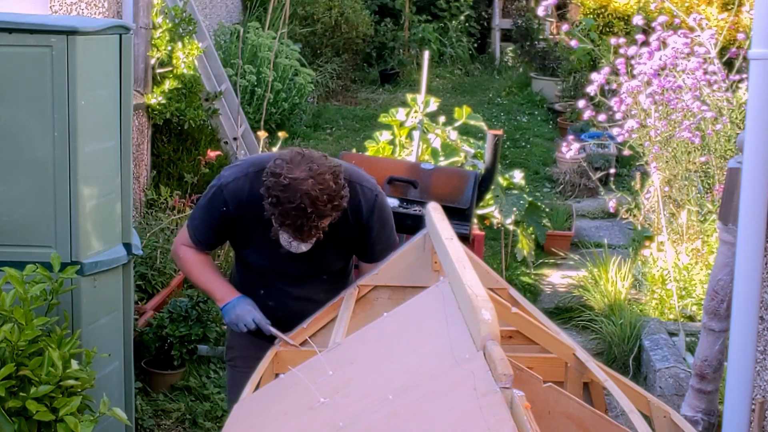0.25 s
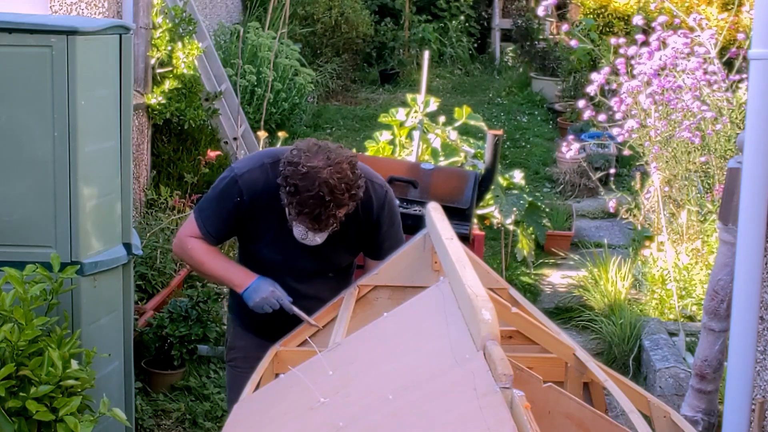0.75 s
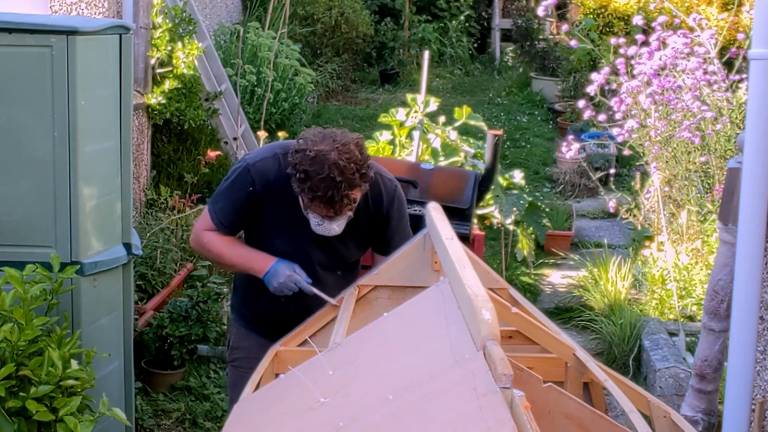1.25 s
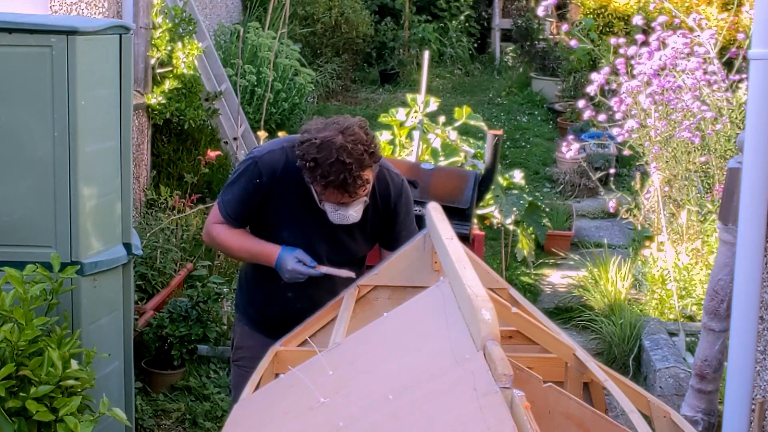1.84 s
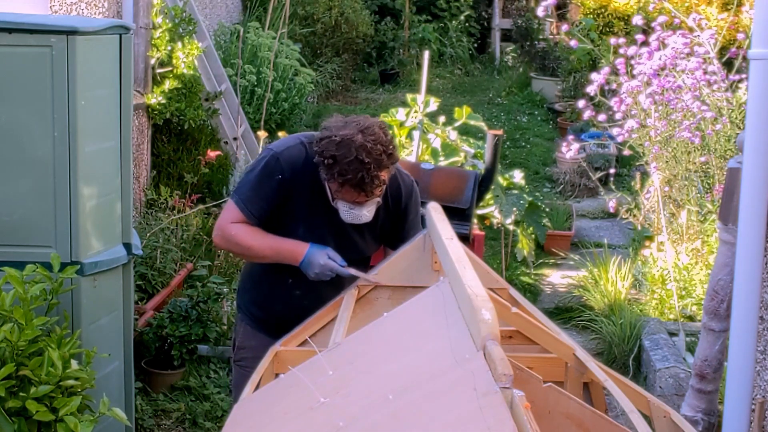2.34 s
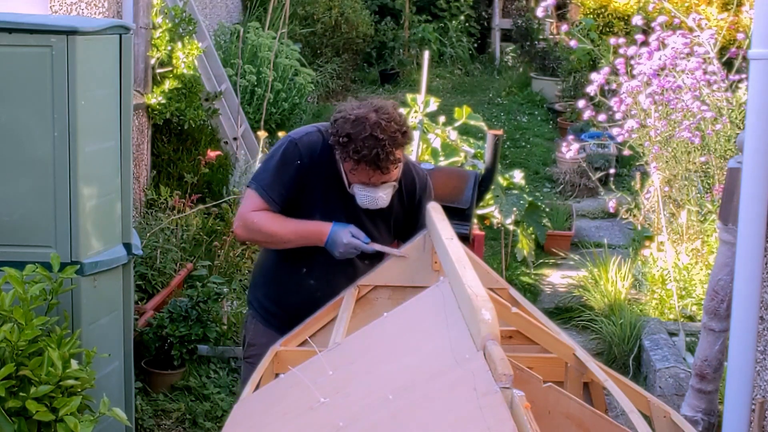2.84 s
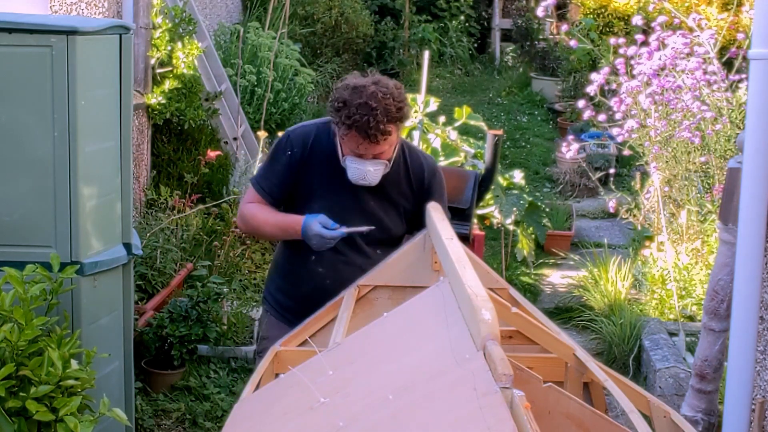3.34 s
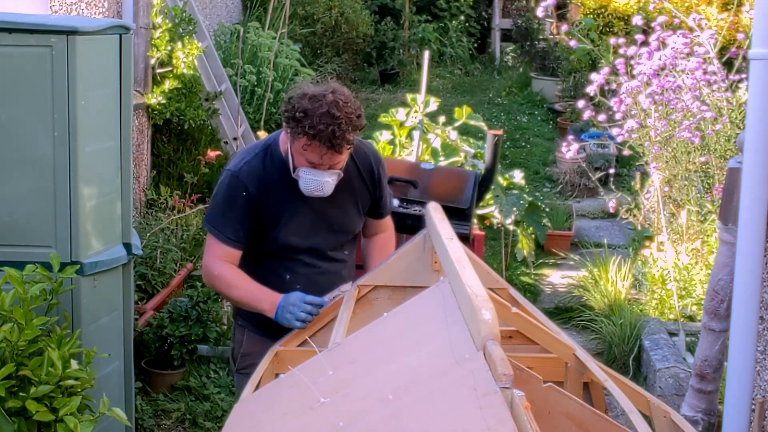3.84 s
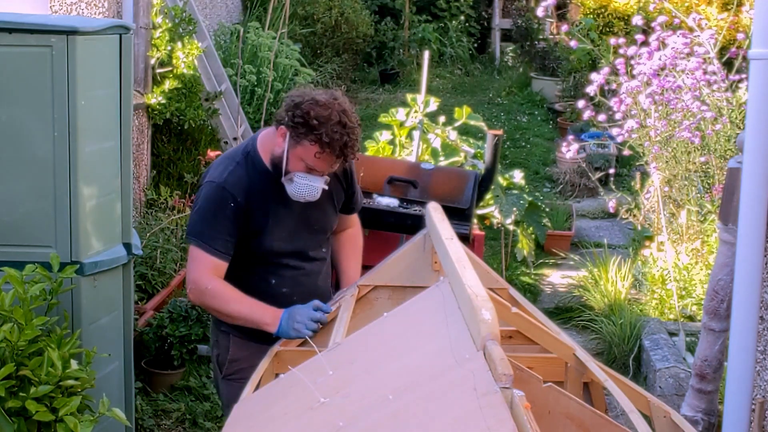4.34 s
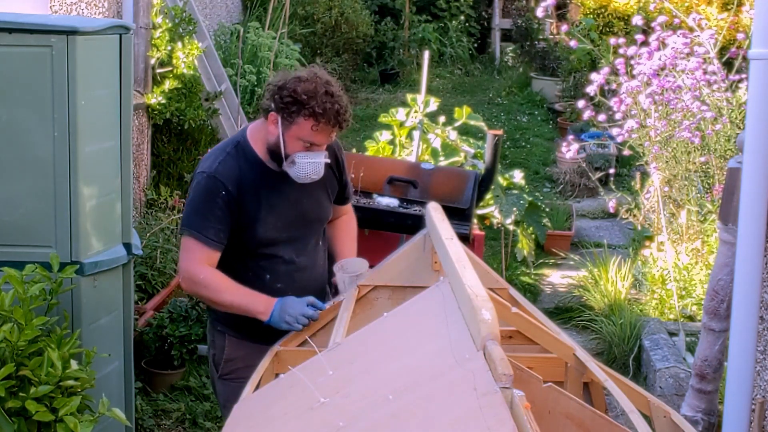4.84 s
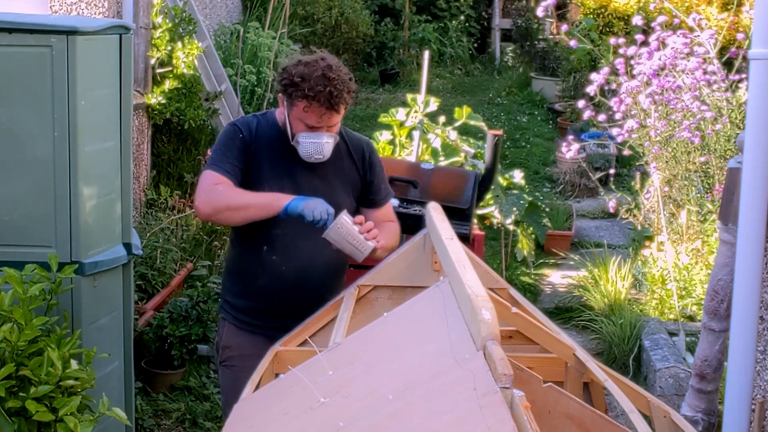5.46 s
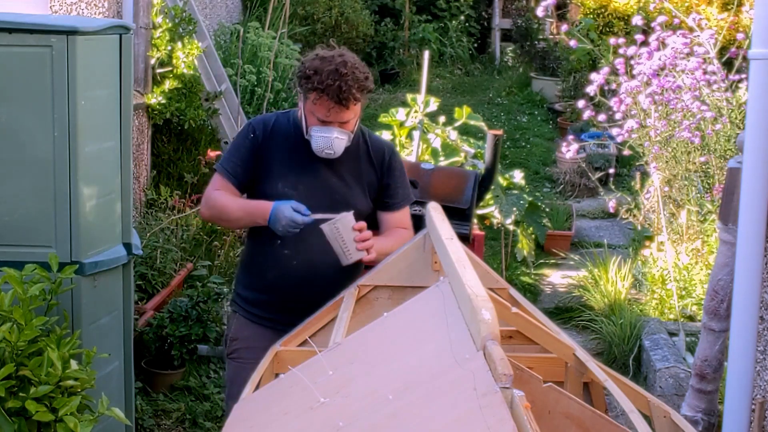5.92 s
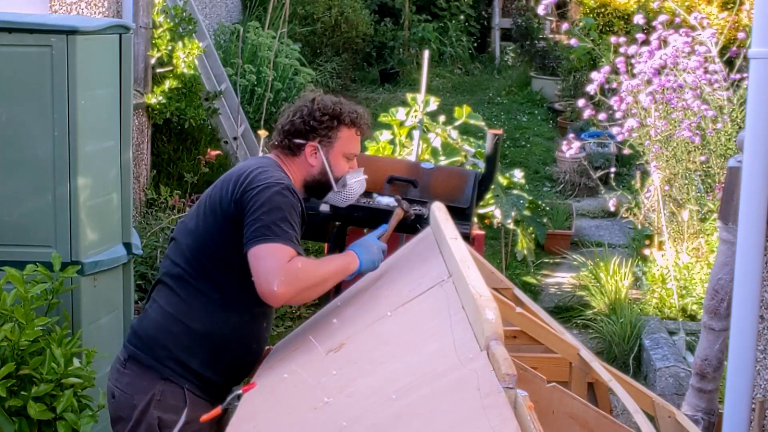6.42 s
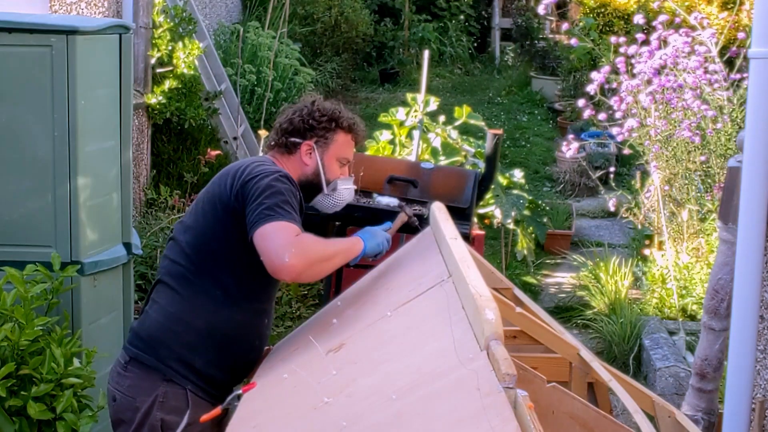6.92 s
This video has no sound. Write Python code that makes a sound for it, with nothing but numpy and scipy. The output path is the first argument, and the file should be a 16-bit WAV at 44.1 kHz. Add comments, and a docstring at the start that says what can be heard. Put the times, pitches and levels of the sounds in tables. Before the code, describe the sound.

Outdoors in a garden, a stick knocks on hollow wooden frames, chatters quickly, then rubs and scratches plywood. A far engine slows and picks up again over traffic and leaf hiss. The stick clacks in a plastic cup and squeaks. A cut ends engine and rubbing with a low thump; a distant dove coos and a single loud hammer blow rings the panel. Wind sways the microphone with deep rumble.

```python
"""Boatbuilding in a garden

A stick rubs, knocks and chatters on plywood and in a plastic cup (friction noise, struck modes), then a
hammer lands one blow on the hull. A far engine slows and speeds up (harmonics of its cycle), a dove coos
(sines), traffic and leaves hiss (coloured noise) and wind sways the microphone (slow resonant noise).
At a splice the engine and the rubbing cut off and a pressure jump thumps."""
import sys
import numpy as np
from scipy.fft import rfft, irfft, next_fast_len
from scipy.io import wavfile
from scipy.ndimage import uniform_filter1d, map_coordinates

SR = 44100
rng = np.random.default_rng(int(sys.argv[2]) if len(sys.argv) > 2 else 0)


def int16_out(signal):
    """Quantize to a 16-bit WAV file."""
    q = np.round(np.clip(np.atleast_2d(signal).T, -1, 1) * 32767)
    wavfile.write(sys.argv[1], SR, q.astype(np.int16))


N = 317079
# The splice: t/s, pressure jump/full scale before its smoothing
SPLICE_POINT = (6.041, 0.3)


def amp(db):
    """Level law: decibels to an amplitude ratio."""
    return 10 ** (np.asarray(db) / 20)


def unit(x):
    """Normalisation to a root-mean-square value of 1."""
    return x / np.sqrt(np.mean(x ** 2) + 1e-20)


def along(points, hz):
    """Spectral envelope: (f/Hz, value) points joined on a logarithmic frequency axis."""
    f, v = np.transpose(points)
    return np.interp(np.log(hz + 1), np.log(f + 1), v)


def curves(rows):
    """Linear interpolation in time: one value per sample for each column after t/s."""
    s, *cols = np.transpose(rows)
    return [np.interp(np.arange(N) / SR, s, c) for c in cols]


def wobble(rate):
    """Slow random modulation: a smooth curve through random knots, rate of them a second."""
    knots = rng.standard_normal(int(N * rate / SR) + 4)
    return map_coordinates(knots, [np.arange(N) * rate / SR])


def filtered(x, response):
    """Linear filtering: the spectrum of x times a complex response of frequency."""
    m = next_fast_len(len(x) + 8192)
    return irfft(rfft(x, m) * response(np.fft.rfftfreq(m, 1 / SR)), m)[:len(x)]


def peak(f, hz, width):
    """Damped oscillator: a causal resonance of gain 1 at its centre."""
    return 1j * f * width / (hz * hz - f * f + 1j * f * width)


def before_splice():
    """Gating: 1 until the splice, 0 after it."""
    return np.arange(N) < SPLICE_POINT[0] * SR


def swell(start, end):
    """Amplitude envelope: a rounded rise and fall between two times in seconds."""
    phase = np.clip((np.arange(N) / SR - start) / (end - start), 0, 1)
    return np.abs(np.sin(np.pi * phase)) ** 0.42


def traffic_and_leaves():
    """Broadband noise from many incoherent sources, coloured by frequency and slightly unsteady."""
    # Mean levels: t/s, traffic level/dB (in 250-1500 Hz), leaves level/dB
    garden_levels = [(0, -45.5, -52.5), (1.5, -44, -54.5), (2.1, -47.5, -54.5), (4, -45.5, -52),
                     (6.03, -46, -54.5), (6.05, -47, -57.5), (7.19, -46.5, -55.5)]
    # Traffic spectrum: f/Hz, relative level per Hz/dB
    traffic_colour = [(12, -23), (25, -27), (40, -26.5), (70, -30), (110, -40.5), (170, -29.5), (260, -38),
                      (450, -39), (1000, -41.5), (1400, -46), (1700, -53.5), (3000, -78.5), (6000, -80.5)]
    # Leaf spectrum: f/Hz, relative level per Hz/dB
    leaf_colour = [(800, 0), (1800, 3.5), (3000, 0), (4400, 0), (5300, -4), (6000, -19), (9000, -21),
                   (16000, -29)]
    traffic_db, leaves_db = curves(garden_levels)
    far = filtered(rng.standard_normal(N), lambda hz: amp(along(traffic_colour, hz)))
    far = far / np.std(filtered(far, lambda hz: (hz > 250) * (hz < 1500)))
    leaves = unit(filtered(rng.standard_normal(N), lambda hz: amp(along(leaf_colour, hz))))
    traffic = amp(traffic_db + 1.1 * wobble(4.115)) * far
    return traffic + amp(leaves_db + 1.1 * wobble(5.6)) * leaves


def microphone_sway():
    """Random excitation of a slow resonance: wind sways the microphone; the splice jumps its swing."""
    sway = filtered(rng.standard_normal(N), lambda hz: peak(hz, 2.41, 1.37) / (1 + (hz / 7) ** 3))
    t = np.maximum(np.arange(N) / SR - SPLICE_POINT[0], 0)
    # the sway is elsewhere in its swing after the splice
    jump = SPLICE_POINT[1] * (1 - np.exp(-t / 0.0018)) * np.exp(-t / 0.083)
    return amp(-19.5) * unit(sway) + jump


def dove():
    """Nearly pure tones: two soft sines from far off, gently wavering in level and phase."""
    # Coos: start t/s, end t/s, f/Hz, mean level/dB
    coos = [(6.678, 6.934, 407, -47.5), (6.938, 7.19, 505, -41)]
    out = np.zeros(N)
    for start, end, hz, db in coos:
        tone = np.sin(2 * np.pi * hz * np.arange(N) / SR + 0.45 * wobble(7.3))
        out += amp(db + 1.5 * wobble(12)) * swell(start, end) * tone
    return out


def engine():
    """Harmonic series: multiples of the engine cycle, each wavering, shaped by the exhaust."""
    # Engine cycle: t/s, f/Hz
    cycle = [(0, 18.4), (.4, 18.2), (.85, 16.7), (2.7, 15.4), (3, 15.5), (4.15, 17.3), (5, 18.2),
             (5.8, 19.4), (6.03, 19.5)]
    # Engine loudness: t/s, relative level/dB
    loudness = [(0, -39), (.45, -43.5), (.9, -48), (2.2, -49), (2.6, -41.5), (3, -34), (3.42, -39),
                (3.95, -33.5), (4.6, -43), (5.4, -44.5), (5.8, -37.5), (6.03, -44)]
    # Exhaust colour: f/Hz, gain/dB
    exhaust = [(30, -44), (80, -14), (105, -17), (125, -3.5), (190, -12.5), (220, -24.5), (400, -21)]
    cycle_hz, = curves(cycle)
    level_db, = curves(loudness)
    turn = 2 * np.pi * np.cumsum(cycle_hz) / SR
    # the ninth multiple carries best at first, later the tenth
    best_multiple = 8.93 + 0.13 * np.arange(N) / SR
    orders = np.zeros(N)
    for k in range(2, 14):
        gain = amp(along(exhaust, k * cycle_hz)) + np.exp(-((k - best_multiple) / 0.67) ** 2)
        waver = amp(2.5 * wobble(2.59))
        orders += gain * waver * np.sin(k * turn + 0.79 * wobble(4) + rng.uniform(0, 2 * np.pi))
    return amp(level_db - 2.5) * orders * before_splice()


def squeaks():
    """Friction-excited resonance: the stick sings along an edge in narrow bands of noise."""
    # Squeaks: start t/s, end t/s, f/Hz, mean level/dB
    songs = [(2.7, 2.92, 1700, -54), (4.43, 4.62, 750, -46), (4.43, 4.62, 1800, -48),
             (4.47, 4.7, 2750, -52), (4.5, 4.7, 3720, -53), (4.6, 4.7, 4340, -52), (4.89, 4.99, 1770, -50),
             (4.82, 5.1, 4550, -58), (5.77, 5.86, 780, -42), (5.885, 5.99, 1340, -43),
             (5.86, 6.0, 3100, -54), (5.85, 6.04, 4550, -54), (5.885, 5.905, 4550, -44),
             (5.922, 5.937, 4600, -45), (5.948, 5.972, 4600, -44)]
    out = np.zeros(N)
    for start, end, hz, db in songs:
        band = filtered(rng.standard_normal(N), lambda f: peak(f, hz, 0.065 * hz) ** 2)
        out += amp(db + 2.1 * wobble(50)) * swell(start, end) * unit(band)
    return out


def scratches():
    """Transient friction: decaying grit of the stick's edge, one broad resonance and a wider hiss."""
    # Scratches: t/s, level/dB before rise and decay, centre f/Hz, relative hiss level/dB
    bursts = [(0.2177, -40.5, 1720, -11), (0.353, -29, 2040, -14), (0.363, -26, 2020, -12),
              (0.487, -28, 1580, -14), (0.622, -20.5, 1500, -18), (0.7165, -39, 1450, -8),
              (1.222, -34, 2200, -2), (2.646, -42, 1710, -1), (3.5967, -32, 2400, 22),
              (3.607, -36, 2400, 15), (3.6172, -33, 1620, -3), (3.6973, -34.5, 1620, -9.5),
              (3.8267, -38, 3670, -15), (3.923, -31.5, 1600, -10), (4.2297, -41, 1590, -24),
              (4.3796, -24.5, 3860, -2.5), (4.544, -33, 1740, 8), (4.6718, -30, 1910, -2),
              (4.788, -37, 1610, -10), (4.915, -38.5, 4540, -3), (5.328, -30.5, 1710, -2),
              (5.3512, -37, 1710, -2), (5.374, -43, 2360, -10), (5.757, -44, 3020, -10),
              (5.774, -39, 1490, 0), (5.8, -33, 2160, -6), (5.822, -27.5, 2180, -1), (5.835, -22, 2300, -7),
              (5.9, -33.5, 3020, 4)]
    rise_s, t60_s = 0.0018, 0.058
    out, t = np.zeros(N + SR), np.arange(SR // 4) / SR
    for s, db, hz, hiss_db in bursts:
        def colour(f):
            bands = peak(f, hz, 0.37 * hz) ** 2 + amp(hiss_db) * peak(f, 2750, 2200) ** 2
            return bands / (1 + 1j * f / 7000)
        grit = unit(filtered(rng.standard_normal(len(t)), colour))
        out[round(s * SR):][:len(t)] += amp(db - 60 * t / t60_s) * (1 - np.exp(-t / rise_s)) * grit
    return out[:N]


def stroke(start, end, first_db, last_db):
    """Pressure envelope: a quick rise, a steady change of level, a quick fall."""
    rise_s, fall_s = 0.032, 0.05
    t = np.arange(N) / SR
    shape = np.clip(np.minimum((t - start) / rise_s, (end - t) / fall_s) + 1, 0, 1)
    return shape ** 2 * amp(np.interp(t, [start, end], [first_db, last_db]))


def grit_noise():
    """Random contact: dense grains of noise with fast and slower unevenness."""
    return rng.standard_normal(N) * amp(0.5 * wobble(300) + 1.4 * wobble(40))


def rubbing():
    """Sliding friction: uneven grains shake the plywood's resonances and hiss at its edge."""
    # Strokes: start t/s, end t/s, first level/dB, last level/dB, edge level over wood/dB before a common gain
    drags = [(0.707, 0.767, -41, -43.5, -12.5), (0.798, 1.157, -46.5, -40.5, -12.5),
             (1.216, 1.304, -35, -42.5, -15), (1.445, 1.55, -35, -51, -16), (1.656, 1.754, -42.5, -46, -13),
             (2.349, 2.514, -44, -45, -10.5), (2.634, 2.917, -46.5, -42.5, -15),
             (2.947, 3.095, -36, -39.5, -16), (3.126, 3.162, -41, -42, -13),
             (4.417, 4.532, -41, -37.5, -12), (4.546, 4.694, -40, -39.5, -9.5),
             (4.896, 4.993, -41, -52.5, -8.5), (5.331, 5.39, -46, -57, 0), (5.753, 5.81, -45, -48, -11),
             (5.829, 5.864, -44, -42.5, -1), (5.886, 6.04, -44.5, -49, -10)]
    # Rubbed plywood: f/Hz, bandwidth/Hz, relative level/dB
    plywood = [(370, 250, 6.5), (751, 122, 11.5), (1056, 190, 8), (1743, 270, 5.5), (2126, 64, 2.5)]
    # Edge hiss: f/Hz, relative level per Hz/dB
    edge_colour = [(880, -49), (1500, -1), (1700, -4.5), (2720, -1), (3950, -4), (4530, -4), (6250, -21),
                   (15500, -36)]

    def wood_response(f):
        total = amp(-14.0) * peak(f, 960, 780)
        for k, (hz, width, db) in enumerate(plywood):
            total = total + (-1) ** k * amp(db) * peak(f, hz, width)  # alternate signs
        return total

    on_wood, on_edge = np.zeros(N), np.zeros(N)
    for start, end, first_db, last_db, edge_db in drags:
        pressure = stroke(start, end, first_db, last_db)
        on_wood += pressure
        on_edge += pressure * amp(edge_db)
    wood = unit(filtered(grit_noise(), wood_response))
    edge = unit(filtered(grit_noise(), lambda hz: amp(along(edge_colour, hz))))
    return (on_wood * wood + on_edge * amp(5.0) * edge) * before_splice()  # common edge gain, dB


def blows(events, modes, noise_db, contact_s, swell_s, centre_hz, blur, t60):
    """Modal synthesis of impacts: decaying modes, a broad rattle and a treble crack; low modes swell slowly."""
    out, t = np.zeros(N + SR), np.arange(SR // 3) / SR
    hz, level_db, die = np.transpose(modes)[:, :, None]
    die_s = die * t60 / die.mean()  # the mean decay becomes t60, in seconds
    mode_rise = (1 - np.exp(-t / (contact_s + swell_s * (200 / hz) ** 2))) ** 2
    contact_rise = (1 - np.exp(-t / contact_s)) ** 2
    for s, db, crack_db, tilt_db in events:
        scatter_db = rng.normal(0, 2, hz.shape)  # no two blows ring a mode alike
        strength_db = level_db + tilt_db * np.log2(hz / centre_hz) + scatter_db
        wander = uniform_filter1d(rng.standard_normal((len(modes), len(t))), size=24, axis=1)
        drift = np.cumsum(wander, axis=1) * blur * np.sqrt(hz / 1000)  # loose joints blur each mode
        vibration = np.sin(2 * np.pi * hz * t + drift)
        ring = (amp(strength_db - 60 * t / die_s) * mode_rise * vibration).sum(axis=0)
        rattle = unit(filtered(rng.standard_normal(len(t)), lambda f: peak(f, centre_hz, centre_hz) ** 2))
        rattle = rattle * amp(-60 * t / (0.8 * t60))
        crack = unit(filtered(rng.standard_normal(len(t)),
                              lambda f: peak(f, 3770, 4800) ** 2 / (1 + 1j * f / 7000) ** 3))
        crack = crack * (amp(-60 * t / (0.42 * t60)) + 0.066 * amp(-60 * t / t60))  # fast decay and faint tail
        noise = contact_rise * (amp(noise_db) * rattle + amp(crack_db) * crack)
        # the first touch snaps up to the highest treble
        snap = amp(crack_db - 1 - 60 * t / 0.012) * (1 - np.exp(-t / 0.0015)) ** 2
        noise += snap * rng.standard_normal(len(t))
        out[round((s - contact_s) * SR):][:len(t)] += amp(db) * (ring / np.abs(ring).max() + noise)
    return out[:N]


def cup_scrapes():
    """Struck shell: short contacts ring the plastic cup's modes; the first comes as a hand picks the cup up,
    the rest from the stick."""
    # Contacts: t/s, ring peak level/dB, crack level over ring/dB, tilt/dB per octave
    contacts = [(4.867, -17, -50, -1), (4.889, -18, -30, -6), (4.928, -25.5, -28, -5.5),
                (4.975, -30, -30, -11)]
    # Cup modes: f/Hz, relative level/dB, relative decay time
    cup_modes = [(148.3, -1, 0.13), (237, -13, 0.094), (373.6, 0.5, 0.2), (466, -6, 0.087),
                 (742, -2.5, 0.06), (1376, -20, 0.23), (1800, -25, 0.087)]
    return blows(contacts, cup_modes, noise_db=-15, contact_s=0.0009, swell_s=0.006,
                 centre_hz=510, blur=0.07, t60=0.1)


def stick_chatter():
    """Repeated impact: the stick bounces on the frames and rings its own modes."""
    # Bounces: t/s, ring peak level/dB, crack level over ring/dB, tilt/dB per octave
    bounces = [(0.149, -34.5, -25, -4), (1.196, -22.5, -24, 4), (1.257, -25.5, -19, 0),
               (1.306, -19.5, -16, 3.5), (1.33, -19, -34, -12), (1.347, -13.5, -15, 4),
               (1.374, -22.5, -32, -6), (1.425, -22.5, -29, 0.5)]
    # Stick modes: f/Hz, relative level/dB, relative decay time
    stick_modes = [(547, 3.5, 0.077), (740, -2, 0.15), (826, 3.5, 0.073), (1046, 6.5, 0.14),
                   (1413, -5, 0.044), (1846, -5, 0.077), (1933, -6.5, 0.15), (3560, -22.5, 0.097),
                   (4050, -18, 0.1)]
    return blows(bounces, stick_modes, noise_db=-9.0, contact_s=0.0035, swell_s=0.0026,
                 centre_hz=1130, blur=0.073, t60=0.12)


def frame_knocks():
    """Struck structure: knocks of the stick ring the modes of the hull's frames."""
    # Knocks: t/s, ring peak level/dB, crack level over ring/dB, tilt/dB per octave
    strikes = [(0.369, -12, -46, 0.5), (0.493, -23.5, -38, 6.5), (0.615, -15.5, -29, -2.5),
               (2.933, -25.5, -30, 8), (3.133, -26.5, -18, -3.5)]
    # Frame modes: f/Hz, relative level/dB, relative decay time
    frame_modes = [(270.5, -4, 0.23), (400, -3, 0.26), (523.7, 1.5, 0.16), (694.6, 0, 0.19),
                   (922.5, -6.5, 0.16), (1090, -23, 0.16), (1404, -15, 0.093), (2083, -14.5, 0.087)]
    return blows(strikes, frame_modes, noise_db=-6.5, contact_s=0.0016, swell_s=0.0013,
                 centre_hz=590, blur=0.08, t60=0.2)


def hammer():
    """Struck plate: one blow rings the big panel, whose lowest modes bloom late."""
    # Blow: t/s, ring peak level/dB, crack level over ring/dB, tilt/dB per octave
    blow = [(7.0335, -6.5, -16, 0)]
    # Panel modes: f/Hz, relative level/dB, relative decay time
    panel_modes = [(144, -5, 0.41), (169.2, -0.5, 0.31), (236.4, -2, 0.37), (322, -11.5, 0.34),
                   (379, -1.5, 0.22), (447, 7, 0.11), (579, -7.5, 0.24), (710, -13, 0.23), (855, -23, 0.19),
                   (1053, -7, 0.19), (1125, -4.5, 0.14), (1263, -9, .13), (1510, -37, 0.067),
                   (1740, -4.5, 0.08), (1900, 0, 0.074), (2450, -24, 0.18), (3300, -15, 0.086)]
    return blows(blow, panel_modes, noise_db=-12, contact_s=0.0032, swell_s=0.011,
                 centre_hz=1230, blur=0.092, t60=0.18)


def scene():
    """Superposition: the garden, the far engine and dove, the stick and the hammer add linearly."""
    background = traffic_and_leaves() + microphone_sway() + dove() + engine()
    friction = squeaks() + scratches() + rubbing()
    impacts = cup_scrapes() + stick_chatter() + frame_knocks() + hammer()
    return (background + friction + impacts)[None]


def record(dry):
    """Band limitation: the microphone adds steady hiss and nothing is kept above the top frequency."""
    top_hz = 15750
    hiss = amp(-66.0) * unit(filtered(rng.standard_normal(N), lambda hz: 1 / (1 + hz / 12000)))
    return filtered(dry[0] + hiss, lambda hz: hz < top_hz)[None]


dry = scene()
out = record(dry)
int16_out(out)
```